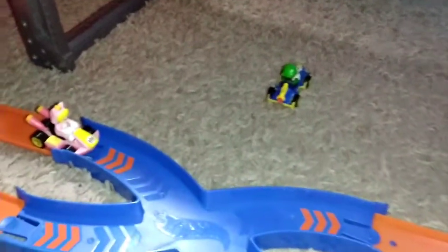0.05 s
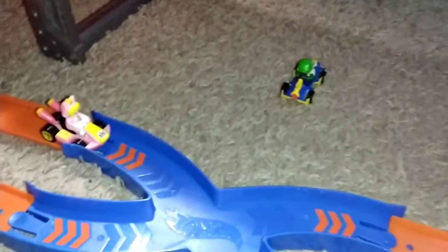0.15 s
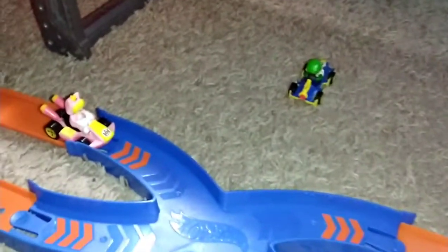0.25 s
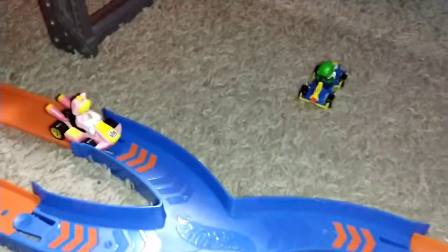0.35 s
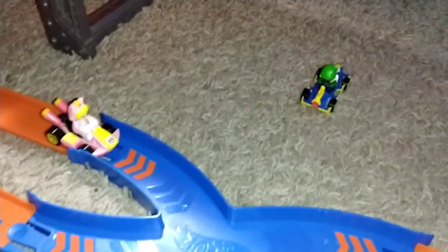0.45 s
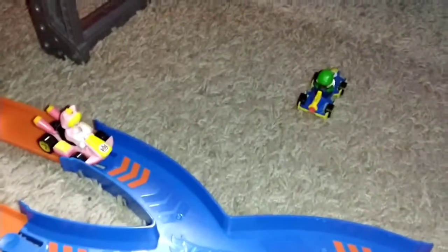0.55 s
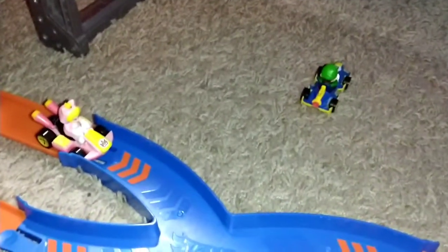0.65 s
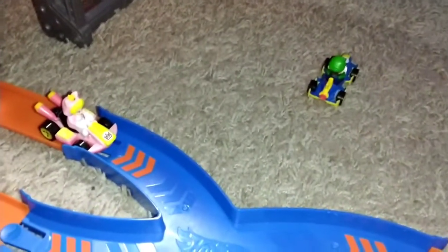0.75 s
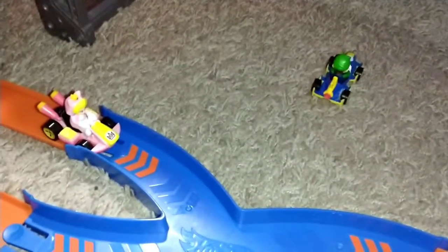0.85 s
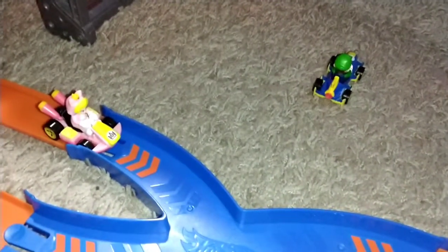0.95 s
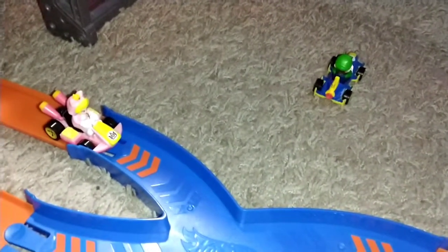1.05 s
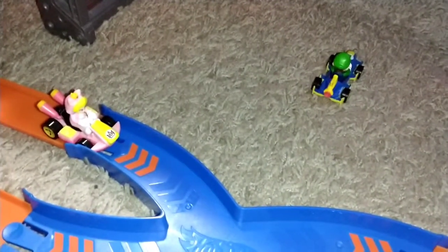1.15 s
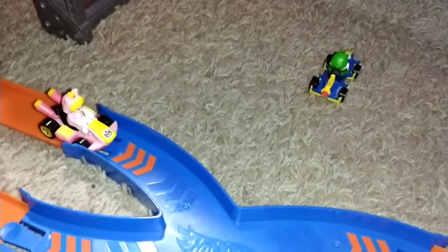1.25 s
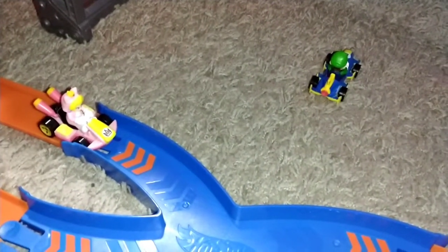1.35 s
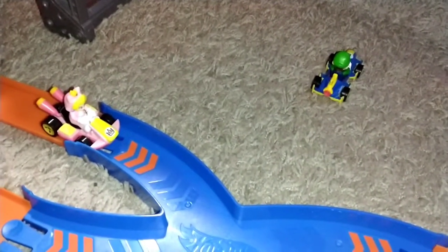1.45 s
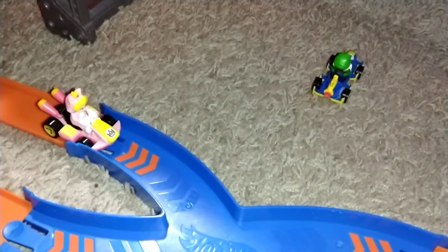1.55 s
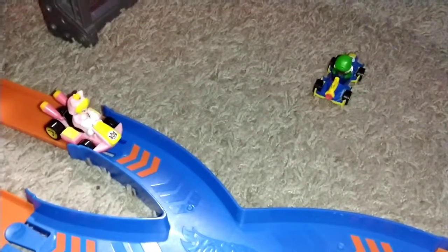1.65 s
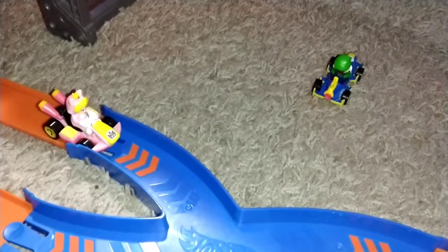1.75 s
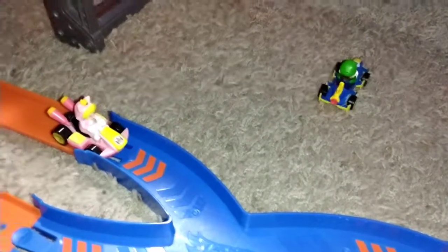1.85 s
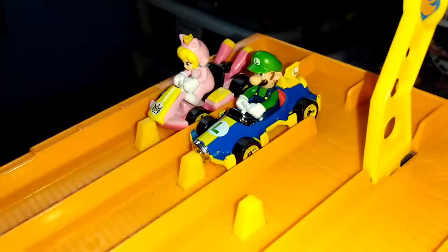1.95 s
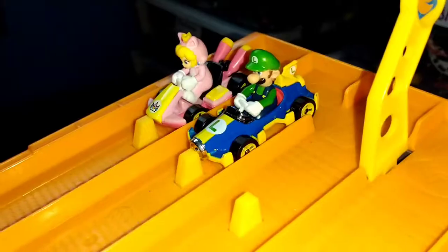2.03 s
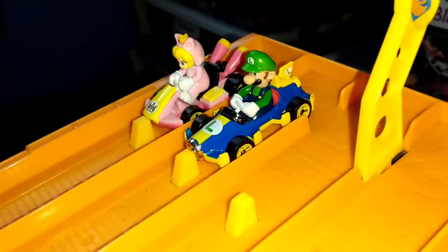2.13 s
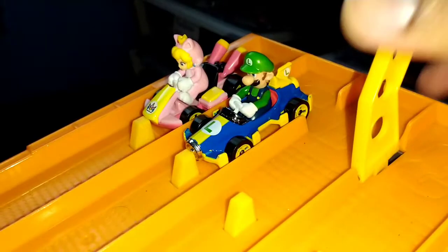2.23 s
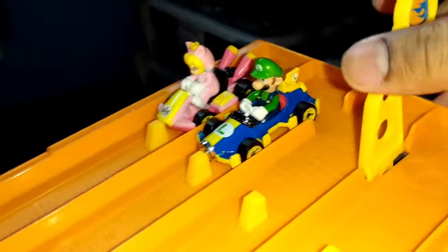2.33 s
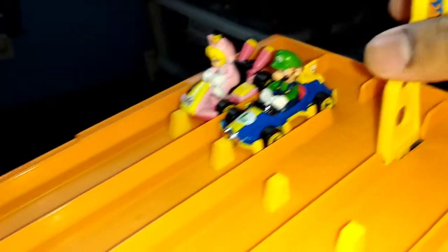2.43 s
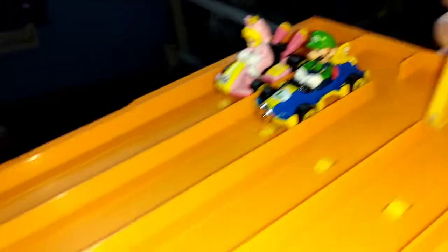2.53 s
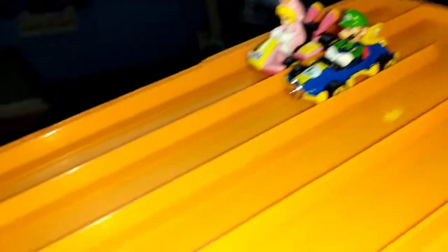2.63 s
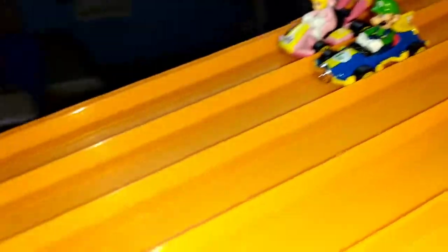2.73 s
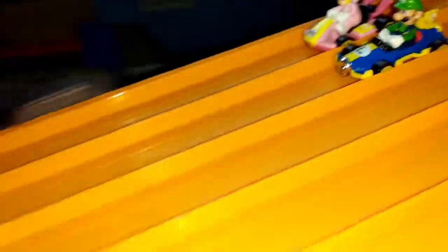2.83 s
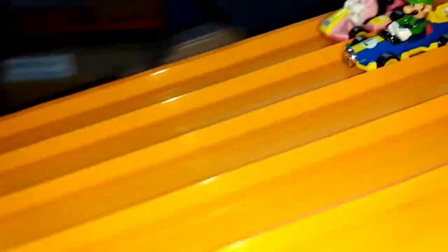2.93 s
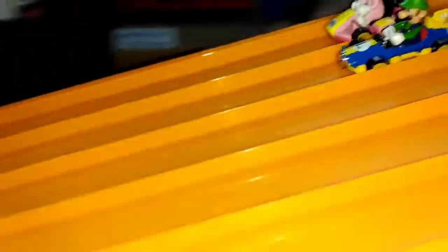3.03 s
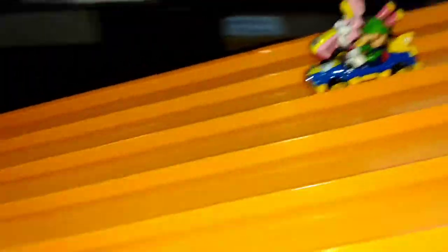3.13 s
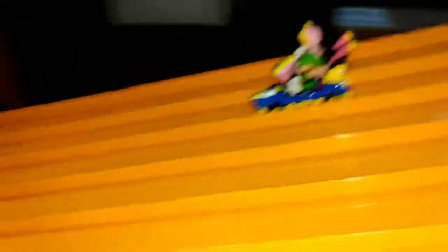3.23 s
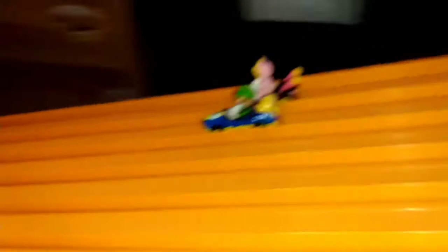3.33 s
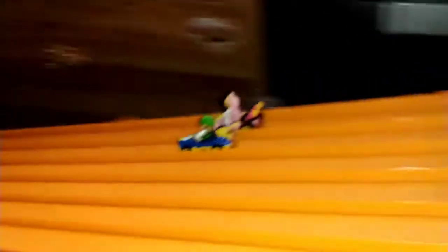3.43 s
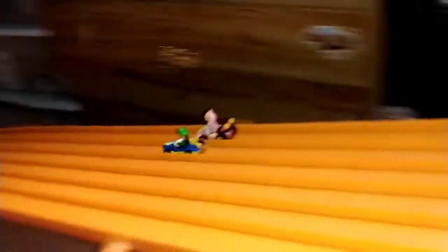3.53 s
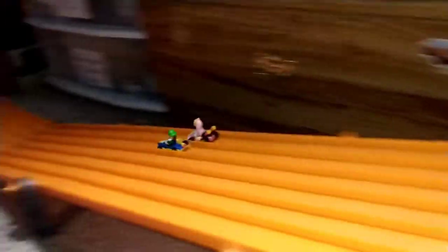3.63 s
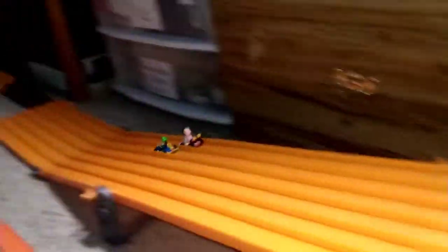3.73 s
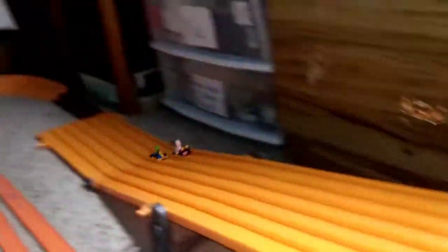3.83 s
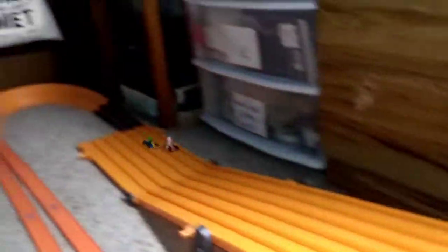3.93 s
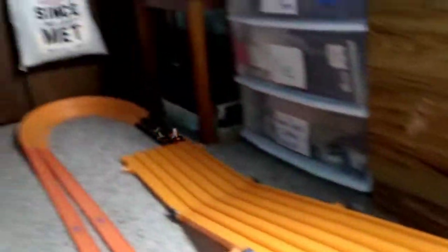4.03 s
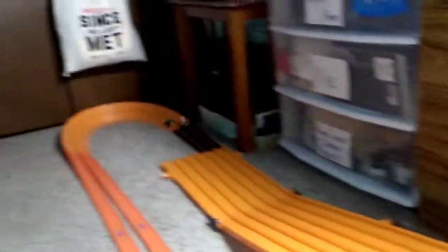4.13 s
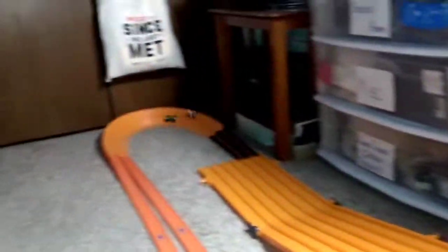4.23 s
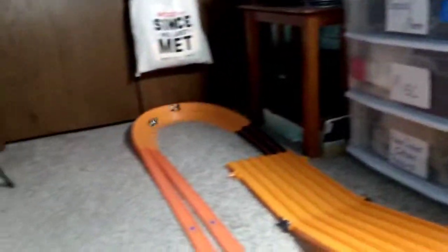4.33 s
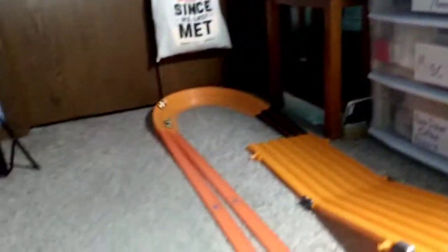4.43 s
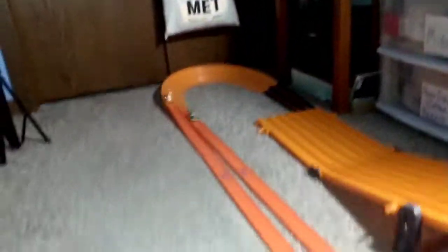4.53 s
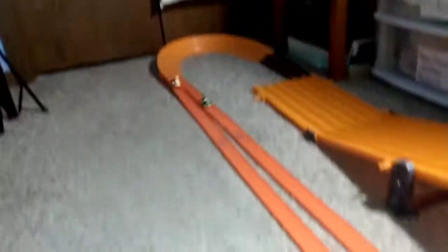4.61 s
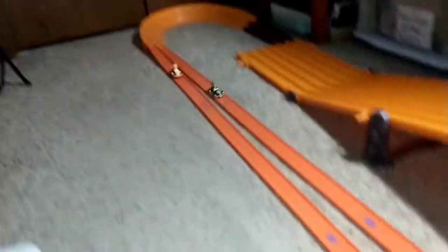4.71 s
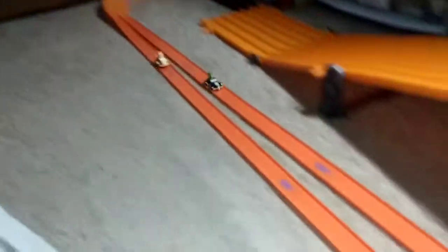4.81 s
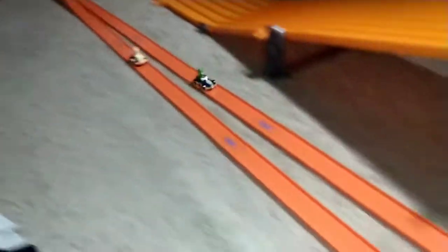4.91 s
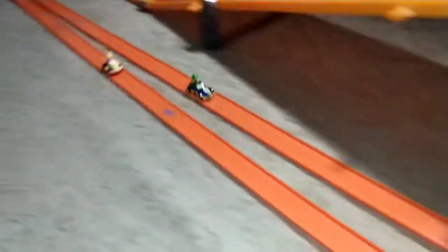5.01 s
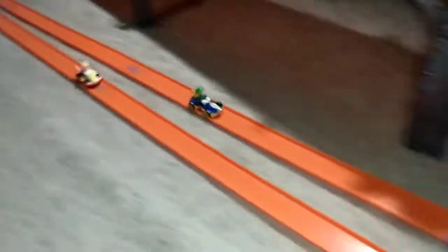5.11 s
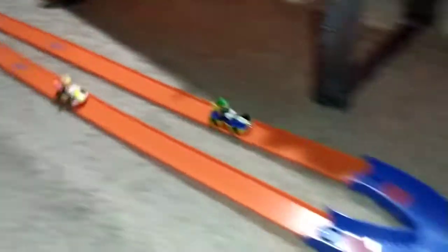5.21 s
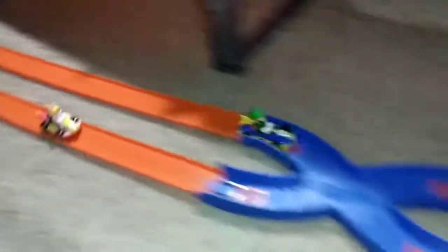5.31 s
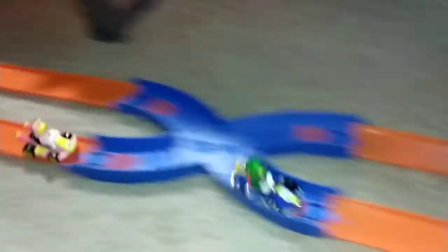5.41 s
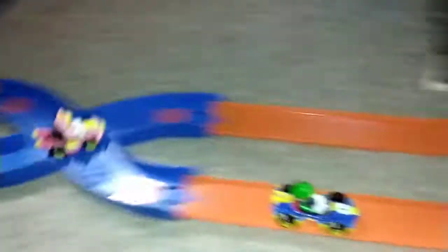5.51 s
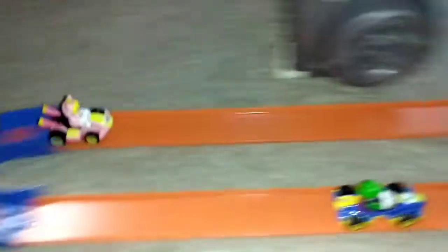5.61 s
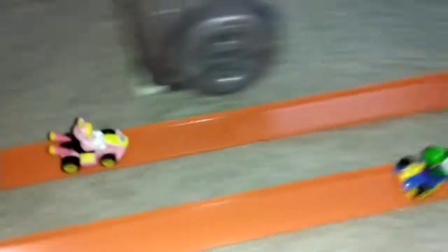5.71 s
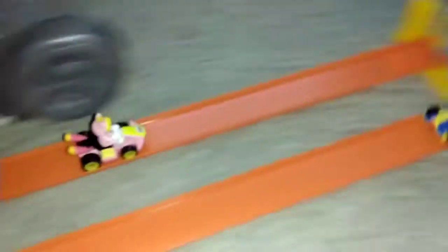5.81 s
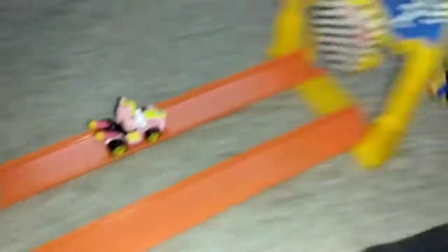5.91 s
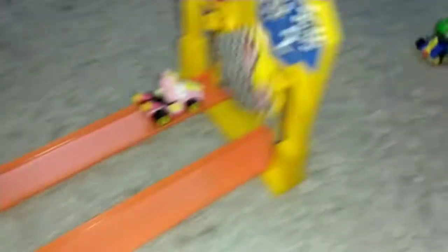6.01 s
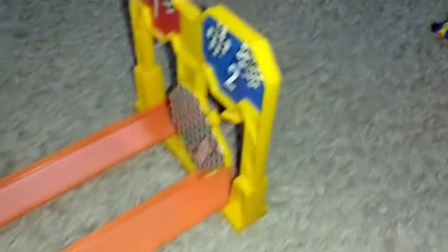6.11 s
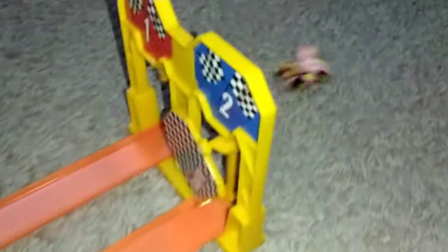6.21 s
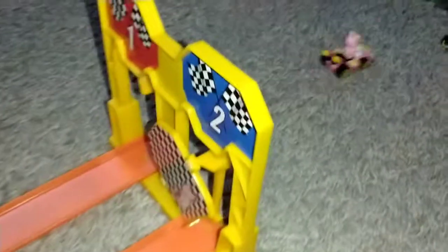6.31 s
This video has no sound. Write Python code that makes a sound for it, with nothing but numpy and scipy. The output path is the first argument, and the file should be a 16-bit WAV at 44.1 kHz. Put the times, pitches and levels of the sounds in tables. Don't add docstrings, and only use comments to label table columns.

```python
import sys
import numpy as np
from scipy import signal
from scipy.fft import rfft, irfft
from scipy.io import wavfile
from scipy.ndimage import uniform_filter1d

SR = 44100
rng = np.random.default_rng(int(sys.argv[2]) if len(sys.argv) > 2 else 0)


def volts(x):
    e = np.asarray(x, float) / 20
    return 10 ** e


def output_pcm(signal):
    pcm = np.clip(np.atleast_2d(signal).T, -1, 1) * 32767
    wavfile.write(sys.argv[1], SR, np.round(pcm).astype(np.int16))


N = 280476

# (frequency [Hz], level [dB per Hz])
ROOM_AIR = [(18, -59), (30, -31), (64, -41), (81, -10.5), (152, -5.5), (177, -11), (243, -10), (307, -16.5),
            (369, -18), (410, -34), (492, -20), (606, -25.5), (673, -21), (728, -21.5), (15500, -48.5)]
# (time [s], level [dB])
ROOM_AIR_LEVEL = [(0, -64), (.3, -65.5), (1.9, -65), (2.55, -63), (2.7, -50), (4.5, -58), (6.36, -56.5)]
# (frequency [Hz], width [Hz], level before the scene changes [dB], level after [dB])
APPLIANCE_HUM = [(102.4, 8.9, -72.5, -71), (245.4, 13, -70, -69.5), (482, 21, -82, -73),
                 (595, 38, -75.5, -83.5)]
# (frequency [Hz], likeness [-1 to 1])
EAR_LIKENESS = [(60, 1), (150, 0.89), (380, 0.86), (700, 0.56), (1400, 0.22), (2800, 0.12), (5980, -0.066),
                (15000, 0.12)]
# (frequency [Hz], left minus right [dB])
EAR_TILT = [(60, -1.0), (100, -1.5), (180, 0.5), (310, -1.0), (550, 1), (950, 0.5), (1650, 0.5),
            (2860, -0.5), (4970, 3), (8640, -5), (15000, -2.5)]
# (frequency [Hz], change [dB])
TOP_LIFT = [(9300, 0), (11600, 0.5), (15500, 6)]

# (frequency [Hz], level [dB per Hz])
RAMP = [(88, -55), (150, -38), (221, -20), (352, -9), (445, -12), (550, -10), (1000, -12.5), (2980, -3),
        (4140, -4.5), (5230, -1), (8490, -5.5), (11800, -21.5), (14600, -17), (15500, -22)]
BEND = [(88, -42), (150, -18), (175, -49), (366, -10), (595, -7), (681, 2.5), (751, -12.5), (877, -0.5),
        (1800, -6), (2600, -1), (3280, -3), (9540, -4), (15500, -22)]
LANE = [(180, -48), (300, -19), (331, -16), (404, -25), (600, -16.5), (808, -9), (1640, -9.5), (3130, 2.5),
        (3810, -5), (4570, -4), (7370, -0.5), (15500, -16.5)]
# (frequency [Hz], width [Hz], level [dB])
RAMP_MODES = [(349, 24, -25), (2670, 12, -32), (2870, 26, -21), (3900, 47, -22), (4710, 64, -12.5),
              (5040, 51, -14.5), (5216, 47, -14.5), (5760, 53, -26), (7800, 81, -35)]
BEND_MODES = [(904, 25, -24), (1140, 25, -23), (1373, 18, -17.5), (2574, 20, -18), (6260, 92, -15.5)]
LANE_MODES = [(2810, 46, -19.5), (3130, 48, -18), (3094, 18, -14.5), (3446, 30, -15), (7000, 500, -10),
              (8350, 90, -24)]
# (time [s], level [dB])
DESCENT = [(2.582, -63.5), (2.597, -46), (2.73, -32), (2.784, -35.5), (3.154, -20), (3.37, -19.5),
           (3.775, -19.5), (3.81, -23.5), (3.94, -20.5), (4.066, -25.5), (4.17, -31.5), (4.36, -21.5),
           (4.51, -25), (4.70, -35), (5.0, -38), (5.37, -31.5), (6.28, -35), (6.36, -41)]
# (hollow boom [dB], brightness [dB], metal body rattle [dB])
TRACK_COLOUR = [
    (-12.5, -11, -6),
    (-13, -7, -4.5),
    (-22.5, -7, -9.5),
]

# (time [s], peak level [dB], ringing frequency [Hz], pan [dB])
FINGER = [
    (1.866, -49, 12000, 0),
    (2.339, -43, 8040, -2),
    (2.346, -48, 7000, -2),
    (2.40, -54, 1800, 0),
    (2.516, -50, 1300, 1),
    (2.546, -49, 2000, 0),
]
RELEASE = [(2.5935, -33, 1500, 0), (2.595, -30, 4500, 0), (2.6215, -28, 5400, 0), (2.638, -29, 4300, 1),
           (2.657, -26, 4150, 0), (2.674, -26, 5000, 0), (2.688, -27, 6000, 0), (2.702, -22, 3900, 0),
           (2.7157, -15, 6300, 1), (2.729, -13, 4800, 1)]
JOINTS = [(2.9762, -8.5, 5440, -16), (3.3456, 3, 5400, -5), (3.7337, -3.5, 4710, -3),
          (3.7714, -7, 5530, -2), (3.9444, -2.5, 4630, 2), (4.2033, -11, 4960, 3), (4.263, -8, 3990, 10),
          (4.6644, -24, 3100, -14), (5.098, -17, 3200, -0.5), (5.1971, -18, 6900, 3)]
CROSSING = [(5.402, -1, 2870, -2), (5.4218, 1, 7060, -2), (5.4302, -4.5, 5640, 4), (5.4363, -7, 5070, 3),
            (5.455, -4.5, 3300, -12), (5.461, -0.5, 3220, 4), (5.4714, 2, 3100, 1), (5.4866, -2, 9300, -6),
            (5.4983, -3.5, 3140, -5), (5.506, -5, 6050, 6), (5.5227, -7, 3300, 3), (5.639, -6.5, 9600, -4)]
FINISH = [(5.8436, -22, 8160, 10), (5.8804, -22, 7460, -7), (5.891, -2.5, 7440, 3),
          (5.9074, -22, 8030, 2.5), (5.943, -9, 8450, -11), (5.9467, -2.5, 5740, 4), (5.9564, -20, 8130, 2),
          (6.0271, -6.5, 9600, -8.5), (6.0295, -5.5, 3600, 12), (6.042, -17, 6620, 20),
          (6.0475, -4, 7900, -1)]
FLAP = [
    (6.105, -2, 8350, 4.5),
    (6.1317, -16, 8220, -1),
    (6.1485, -19, 8500, 0),
    (6.1559, -2, 8360, 1.5),
    (6.179, -16.5, 8100, 18),
    (6.1958, -13.5, 8050, 0),
]
TUMBLE = [(6.236, -16, 6950, 3), (6.242, -15.5, 6000, 16), (6.2678, -8.5, 8300, 16),
          (6.2708, -12, 7500, -6), (6.2736, -3.5, 7000, -8), (6.279, -9, 7000, 6), (6.3093, -11.5, 6980, 6),
          (6.3187, -16, 6600, 4)]
# (rise [s], time to die by 60 dB at full force [s], share of ringing [dB])
STRIKE_KINDS = [
    (0.00034, 0.032, -3.5),
    (0.00031, 0.019, -9),
    (0.00032, 0.018, -1),
    (0.000097, 0.023, -5),
    (0.00012, 0.033, -2.5),
    (0.00019, 0.02, -4),
]
# (frequency [Hz], level [dB per Hz])
CLACK = [(290, -49), (500, -32), (1750, -12.5), (3580, -1), (4980, 0.5), (5750, -1.5), (6360, -3),
         (9240, -5), (15500, -20)]
# (frequency [Hz], extra ringing [dB])
LOW_RING = [(1500, 10.5), (3000, 0.088)]

# (time [s], level [dB])
LEG_JOLTS = [(2.594, -42), (2.66, -40), (2.678, -38.5), (2.70, -45), (2.73, -38), (2.80, -42),
             (3.95, -29.5), (4.25, -31), (4.66, -36)]
CARPET_THUDS = [
    (6.2795, -14.5),
    (6.2855, -28),
]
# (frequency [Hz], level [dB], time to die by 60 dB [s])
RAMP_LEGS = [(166, -12, 0.046), (352, 1.5, 0.053), (563, -9, 0.019)]
FLOORBOARD = [(170, -12, .06), (370, -13, .04), (700, 0, .028), (1300, -14, .015)]
GATE_FRAME = [(814, -34.5, 0.047), (1264, -28, 0.038), (2070, -27, 0.023), (5820, -21, 0.044),
              (8350, -21, 0.039)]

SCENE_CHANGE_S = (1.915, 2.2334)


def rms_one(x):
    return x / np.sqrt(np.mean(x ** 2) + 1e-20)


def in_time(rows):
    s, values = np.transpose(rows)
    return np.interp(np.arange(N) / SR, s, values)


def at_hz(points, hz):
    table_hz, values = np.transpose(points)
    return np.interp(np.log(hz), np.log(table_hz), values)


def band_db(spectrum, low, high):
    hz = np.linspace(low, high, 200)
    power = np.mean(volts(2 * at_hz(spectrum, hz)))
    return 10 * np.log10(power * (high - low) / (SR / 2))


def filtered(x, order, hz, kind="low"):
    return signal.sosfilt(signal.butter(order, hz, kind, fs=SR, output="sos"), x)


def drift(rate_hz):
    r = np.exp(-80 * np.pi * rate_hz / SR)
    noise = rng.standard_normal(N // 40 + 2002)
    slow = signal.lfilter([1], [1, -2 * r, r * r], noise)[2000:]
    return np.interp(np.arange(N) / 40, np.arange(len(slow)), rms_one(slow))


def resonance(x, hz, width_hz):
    r = np.exp(-np.pi * width_hz / SR)
    top = np.array([1, 0, -1]) * (1 - r * r) / 2
    return signal.lfilter(top, [1, -2 * r * np.cos(2 * np.pi * hz / SR), r * r], x)


def to_ears(mid, side, hz):
    alike = np.clip(at_hz(EAR_LIKENESS, hz), -1, 1)
    tilt_db = at_hz(EAR_TILT, hz) / 2
    shared = np.sqrt(1 + alike) * mid
    apart = np.sqrt(1 - alike) * side * [[1], [-1]]
    return (shared + apart) * volts(np.array([[tilt_db], [-tilt_db]]))


def coloured(whites, gain_db):
    out = 0
    edges = 40 * 2 ** (np.arange(27) / 3)
    for k, (low, high) in enumerate(zip(edges, edges[1:])):
        mid, side = filtered(whites[k % 2], 2, [low, high], "band")
        hz = np.sqrt(low * high)
        out = out + volts(gain_db(hz)[-len(mid):]) * to_ears(mid, side, hz)
    return out


def hush():
    t = np.arange(N) / SR
    after = t > SCENE_CHANGE_S[0]
    air = coloured(rng.standard_normal((2, 2, N)), lambda hz: at_hz(ROOM_AIR, hz) + drift(2.8))
    out = rms_one(air)
    for hz, width_hz, before_db, after_db in APPLIANCE_HUM:
        hum = rms_one(resonance(rng.standard_normal((2, N)), hz, width_hz))
        out += volts(np.where(after, after_db, before_db) + 60) * to_ears(*hum, hz)
    motor_hz = 149.8 + 0.78 * drift(2.8)
    motor_db = np.where(after, -79.5, -64) + 66.5 + 3.0 * drift(0.72)
    out += volts(motor_db) * np.sin(2 * np.pi * np.cumsum(motor_hz) / SR)
    hiss = filtered(rng.standard_normal((2, N)), 2, (3000, 12000), "band")
    hiss_rise_s, hiss_t60_s = 0.1, 2.6
    hiss_gain = volts(-69.5 - 60 * t / hiss_t60_s) * np.minimum(t / hiss_rise_s, 1)
    return volts(in_time(ROOM_AIR_LEVEL)) * out + hiss_gain * hiss


def knocks(rows, rise_s, full_t60_s, share_db):
    length = round(0.12 * SR)
    t = np.arange(length) / SR
    hz_axis = np.fft.rfftfreq(length, 1 / SR) + 1
    hold_power = 1.54
    out = np.zeros((2, N + length))
    for s, db, hz, pan_db in rows:
        t60_s = full_t60_s * volts(0.21 * db)
        ring_db = share_db + at_hz(LOW_RING, hz)
        shared, left, right = rng.standard_normal((3, length))
        white = shared * 0.5 + np.array([left, right]) * 0.51
        clack = rms_one(irfft(rfft(white) * volts(at_hz(CLACK, hz_axis)), length))
        dull = filtered(clack, 2, 4000).mean(axis=0)
        bright = filtered(clack, 2, 4000, "high")
        swell = (1 - np.exp(-t / (rise_s + 0.0021))) * volts(-60 * (t / (1.18 * t60_s)) ** hold_power)
        snap = (1 - np.exp(-t / rise_s)) * volts(-60 * (t / t60_s) ** hold_power)
        ring = resonance(white * snap, hz, 410) * 7.65 * volts(ring_db)
        burst = bright * snap + 1.59 * dull * swell + ring
        start = round(s * SR)
        out[:, start:start + length] += volts(db - 10.0 + np.array([[pan_db], [-pan_db]]) / 2) * burst
    return out[:, :N]


def thuds(blows, modes):
    clicks = np.full(N, 1e-18)
    for s, db in blows:
        clicks[round(s * SR)] = -volts(db)
    out = 0
    for hz, db, t60_s in modes:
        r = volts(-60 / (t60_s * SR))
        w = 2 * np.pi * hz / SR
        ringing = signal.lfilter([0, np.sin(w)], [1, -2 * r * np.cos(w), r * r], clicks)
        out = out + volts(db) * ringing
    return filtered(out, 2, 90, "high")


def fingers_and_pegs():
    return knocks([*FINGER, *RELEASE], *STRIKE_KINDS[0])


def contacts(per_s, spread_db, t60_s, smooth):
    sizes = volts(spread_db * np.minimum(rng.exponential(1, N), 2.2))
    taps = (rng.random(N) < per_s / SR) * sizes
    ringing = rms_one(signal.lfilter([1], [1, -volts(-60 / (t60_s * SR))], taps))
    return rms_one(smooth + np.minimum(ringing, 4))


def rolling():
    t = np.arange(N) / SR
    first = round(2.5 * SR)
    crossing_s = (5.385, 5.41, 5.635, 5.72)
    level_db = in_time(DESCENT) + np.interp(t, crossing_s, (0, 7, 10, 0.5))
    level_db += np.interp(t, (6.17, 6.225), [0, -6.5])
    on_bend = np.interp(t, (3.97, 4.32), [0, 1])
    on_lane = np.interp(t, (4.57, 4.99), [0, 1])
    shares = [1 - on_bend, on_bend - on_lane, on_lane]

    colour_per_db = (-0.71, 0.0751, 0.31)
    louder_db = np.maximum(level_db, -42) + 27
    colour = np.transpose(TRACK_COLOUR) @ shares + np.outer(colour_per_db, louder_db)
    hollow_db, bright_db, rattle_db = colour
    speed = shares[0] * np.interp(t, (3.13, 3.75, 3.85), [0, 1, 0.5])
    leaving = np.interp(t, (5.62, 6.28), [0, 1])
    bright_db += 6 * speed + 6 * leaving
    rattle_db += 5 * speed + 10 * leaving + 6.5 * np.interp(t, crossing_s, [0, 1, 1, 0])
    rattle_db += -3 * np.interp(t, (4.72, 4.88, 5.1, 5.3), [0, 1, 1, 0])
    hollow_db += 8 * np.interp(t, (4.35, 4.39, 4.51), [0, 1, 0])

    def under_cars(measure):
        pieces = zip(shares, (RAMP, BEND, LANE))
        return sum(share * (measure(piece) - band_db(piece, 1500, 12000)) for share, piece in pieces)

    hollow_db = hollow_db - under_cars(lambda piece: band_db(piece, 250, 1500))
    bright_db = bright_db - under_cars(lambda piece: band_db(piece, 7500, 15000))
    rattle_db = rattle_db - under_cars(lambda piece: band_db(piece, 4000, 6500))

    def gain_db(hz):
        low = at_hz([(1200, 0.78), (2000, 0.067)], hz)
        top = at_hz([(6300, 0), (8000, 0.94)], hz)
        middle = at_hz([(3400, 0), (4100, 0.82), (6000, 0.61), (7300, 0.02)], hz)
        track_db = under_cars(lambda piece: at_hz(piece, hz)) + on_bend * at_hz(TOP_LIFT, hz)
        return track_db + low * hollow_db + top * bright_db + middle * rattle_db + 0.99 * drift(15.5)

    slow_taps = contacts(300, spread_db=2.0, t60_s=0.03, smooth=2.8)
    quick_taps = contacts(200, spread_db=3.0, t60_s=0.004, smooth=3.2)
    chatter = rms_one(slow_taps * quick_taps * volts(0.34 * drift(14)))[first:]
    out = coloured(rng.standard_normal((2, 2, N - first)) * chatter, gain_db)

    taps = contacts(174, spread_db=2.5, t60_s=0.0064, smooth=0.52)[first:]
    taps = rng.standard_normal((2, N - first)) * taps
    ring_shares = [shares[0], shares[1], on_lane * volts(np.interp(t, [5.6, 5.8], [0, -7]))]
    for share, modes in zip(ring_shares, (RAMP_MODES, BEND_MODES, LANE_MODES)):
        for hz, width_hz, db in modes:
            gain = (share * volts(db + 2.0 * drift(6.1)))[first:]
            out += gain * to_ears(*rms_one(resonance(taps, hz, width_hz)), hz)
    set_off = np.interp(t, [2.53, 2.57, 2.72, 2.76], [0.058, 0.52, 0.53, 0.99])
    return set_off * volts(level_db) * np.pad(out, ((0, 0), (first, 0)))


def ramp_legs():
    return thuds(LEG_JOLTS, RAMP_LEGS)


def track_joints():
    return knocks(JOINTS, *STRIKE_KINDS[1])


def crossing_clatter():
    return knocks(CROSSING, *STRIKE_KINDS[2])


def finish_gate():
    strikes = sum(knocks(rows, *kind) for rows, kind in zip((FINISH, FLAP, TUMBLE), STRIKE_KINDS[3:]))
    blows = [row[:2] for row in [*FINISH, *FLAP, *TUMBLE]]
    return filtered(strikes + thuds(blows, GATE_FRAME), 4, 680, "high")


def carpet_landing():
    return thuds(CARPET_THUDS, FLOORBOARD)


def room(x):
    t = np.arange(round(0.4 * SR)) / SR
    t60_s, level_db = 0.16, -10
    tail = rng.standard_normal((2, len(t))) * volts(-60 * t / t60_s) * (t > 0.006)
    tail = rms_one(filtered(tail, 1, 9000)) / np.sqrt(len(t))
    return volts(level_db) * signal.fftconvolve(x, tail, axes=1)[:, :N]


def thinned_treble(x):
    hz, _, z = signal.stft(x, SR, "cosine", 1024)
    power = np.sum(abs(z) ** 2, axis=0)
    power = uniform_filter1d(uniform_filter1d(power, 30, axis=0), 9, axis=1)
    far_under = power < volts(2 * -9) * power.max(axis=0)
    weak = far_under & (hz > 3600)[:, None] | (hz > 11200)[:, None]
    patches = rng.random((len(hz) // 5 + 1, z.shape[2] // 3 + 1)) < 0.33
    dropped = np.repeat(np.repeat(patches, 5, axis=0), 3, axis=1)[:len(hz), :z.shape[2]]
    kept = ~(dropped & weak) & (hz < 15500)[:, None]
    return signal.istft(z * kept, SR, "cosine", 1024)[1][:, :N]


def scene():
    strikes = fingers_and_pegs() + track_joints() + crossing_clatter()
    ending = finish_gate() + ramp_legs() + carpet_landing()
    race = 0.9 * np.tanh((rolling() + strikes) / 0.9)
    return thinned_treble(race + room(strikes)) + np.tanh(ending + room(ending)) + hush()


def band_limit(x):
    return signal.sosfilt(signal.butter(12, 16620, fs=SR, output="sos"), x)


def record(dry):
    t = np.arange(N) / SR
    kept = (t < SCENE_CHANGE_S[0]) | (t > SCENE_CHANGE_S[1])
    noisy = dry + volts(-88) * rng.standard_normal(dry.shape)
    top_cut = signal.cheby2(10, 60, 16700, fs=SR, output="sos")
    mix = signal.sosfilt(top_cut, noisy * kept) * kept
    return band_limit(mix)


dry = scene()
out = record(dry)
output_pcm(out)
```